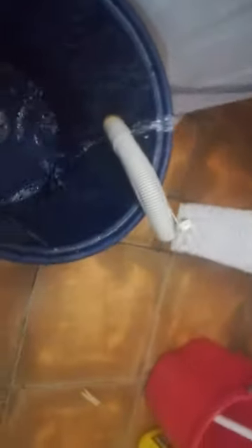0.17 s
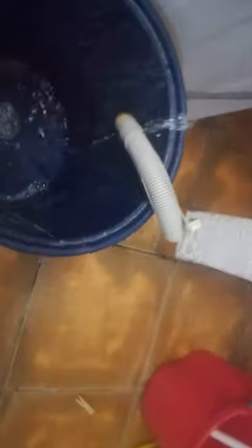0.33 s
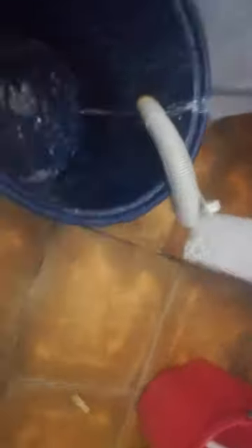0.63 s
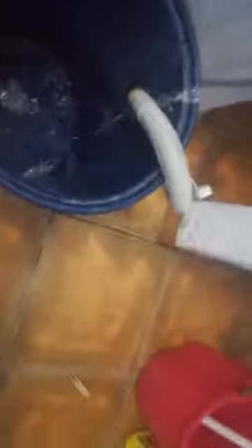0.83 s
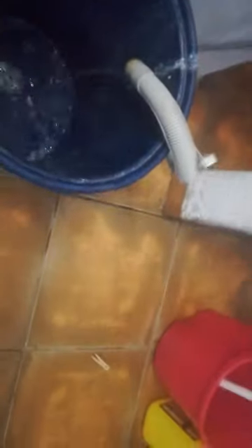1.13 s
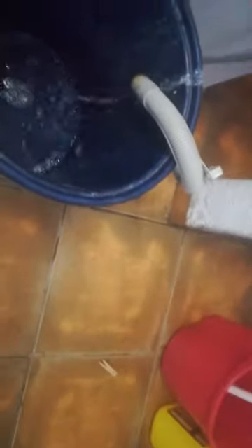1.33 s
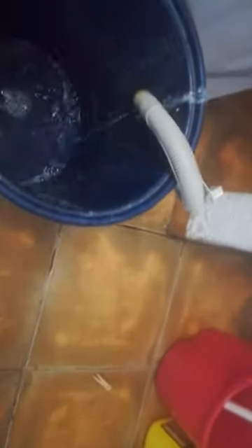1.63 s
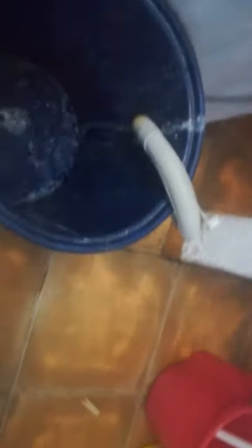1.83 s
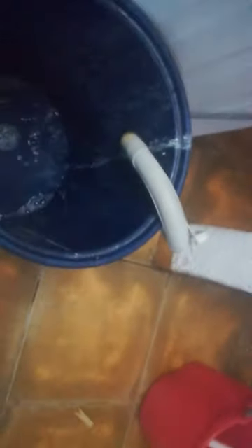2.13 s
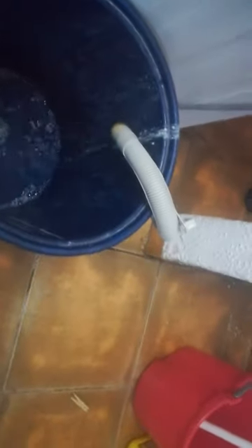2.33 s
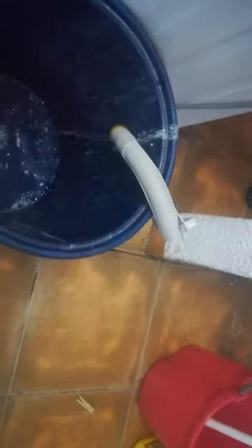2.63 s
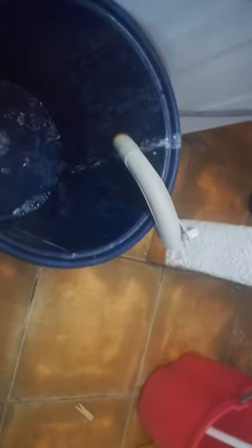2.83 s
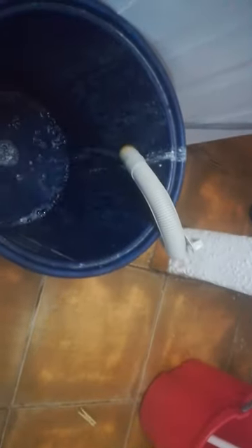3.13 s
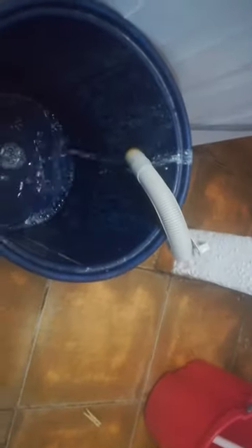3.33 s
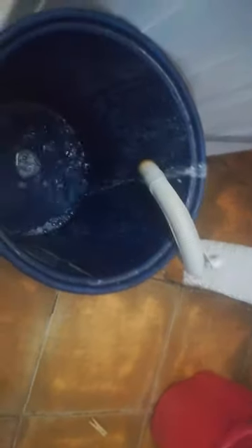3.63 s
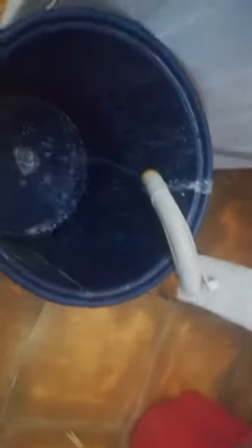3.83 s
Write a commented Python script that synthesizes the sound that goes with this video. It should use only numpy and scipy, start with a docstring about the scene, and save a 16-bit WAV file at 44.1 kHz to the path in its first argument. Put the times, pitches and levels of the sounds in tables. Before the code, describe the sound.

Water spurts from a drain hose into a plastic barrel, already splashing at 0 s, with new surges beginning near 0.2, 0.9, 1.6, 2.2, 2.9 and 3.6 s. Each builds from a brief lull into gurgling rush, bubbly plops and crisp spray ticks. A low mains-like pump hum near 150 Hz swells along, over rumble and throbbing. A dull knock falls near 1 s. Faint hiss, short room echo, left side brighter.

```python
"""In a tiled room, a washing machine's drain pump pushes water in surges up a ribbed hose into a plastic barrel.
The pump is a sum of sines on the mains multiples, swelling with each surge, over noise rumble and a low throb.
The water is flickering coloured noise, gurgling hose resonances, ringing bubbles, noise splats and bright spits.
The left microphone is nearer; the right hears the scene later and duller."""
import sys
import numpy as np
from scipy import signal
from scipy.fft import rfft, irfft, next_fast_len
from scipy.io import wavfile

SR = 44100
rng = np.random.default_rng(int(sys.argv[2]) if len(sys.argv) > 2 else 0)


def natural_amplitude(level_db):
    """Convert a level in decibels to a linear amplitude factor, elementwise."""
    exponent = np.asarray(level_db, float) / 20
    return 10 ** exponent


def to_wav(sig):
    """Store sig (one row per channel, or 1-D mono) as 16-bit WAV at the path in sys.argv[1].

    Samples outside -1..1 are clipped; the rate is SR.
    """
    pcm = np.clip(np.atleast_2d(sig), -1, 1) * 32767
    pcm = np.round(pcm).astype(np.int16)
    wavfile.write(sys.argv[1], SR, pcm.T)  # frames by channels


N = 175959


def at_time(rows):
    """Linear interpolation: each column of a time curve read at every sample."""
    s, *columns = np.transpose(rows)
    return [np.interp(np.arange(N) / SR, s, column) for column in columns]


def at_hz(points, hz):
    """Interpolation on a logarithmic frequency axis, as hearing spaces pitch."""
    point_hz, value = np.array(points)[:, 0], np.array(points)[:, 1]
    return np.interp(np.log(hz + 1), np.log(point_hz), value)


def rms_one(x):
    """Power normalisation: scale to rms 1."""
    return x / np.sqrt(np.mean(x ** 2) + 1e-20)


def drift(rate):
    """Low-passed random process: white noise through a double pole, spread 1, made at 1/40 of the sample rate."""
    pole = np.exp(-80 * np.pi * rate / SR)
    white = rng.standard_normal(N // 40 + 2002)
    slow = signal.lfilter([1], [1, -2 * pole, pole * pole], white)[2000:]  # skip the filter's start
    return np.interp(np.arange(N) / 40, np.arange(len(slow)), rms_one(slow))


# Incoherence of the noise between the two sides: pitch_hz [Hz], unshared_part [0-1]
UNSHARED_NOISE = [(60, 0.4), (300, 0.17), (1000, 0.58), (3000, 0.87), (8000, 1), (15000, 1)]


def noise(spectrum, patchy_db, rate):
    """Partial coherence: two partly alike channels of coloured noise whose octave bands flicker; left rms 1."""
    hz = np.fft.rfftfreq(N, 1 / SR)
    shared, own = rfft(rng.standard_normal((2, N)))
    apart = np.clip(at_hz(UNSHARED_NOISE, hz), 0, 1)
    right = np.sqrt(1 - apart ** 2) * shared + apart * own
    pair = np.array([shared, right]) * natural_amplitude(at_hz(spectrum, hz))
    out, together = 0, drift(rate)
    for centre in 62.5 * 2 ** np.arange(9):
        octaves_away = np.log2(np.clip(hz, 62.5, 16000) / centre)
        band = np.cos(np.pi / 2 * np.clip(octaves_away, -1, 1)) ** 2
        if at_hz(spectrum, centre) > -60:
            flicker_db = patchy_db * (0.94 * together + drift(2 * rate))
            out = out + irfft(pair * band, N) * natural_amplitude(flicker_db)
    return out / np.sqrt(np.mean(out[0] ** 2))


def add(out, s, grain):
    """Superposition: lay a grain into one channel from time s."""
    i = int(max(s, 0) * SR)
    out[i:i + len(grain)] += grain[:len(out) - i]


PLACE_DB, PLACE_S = 2.5, .00006  # scatter of level and lag on the right side


def place(out, s, grain, where):
    """Interaural difference: each drop falls at its own spot, so the right side gets its own level and lag."""
    add(out[0], s, grain)
    add(out[1], s + PLACE_S * where[0], grain * natural_amplitude(PLACE_DB * where[1]))


# Spectral density of the room hiss, relative: pitch_hz [Hz], level_db [dB per Hz]
HISS_SPECTRUM = [(500, 1.5), (700, -11), (1400, -2.5), (2300, -15), (3300, -7), (4500, -11.5), (7000, -15),
                 (11000, -20), (14000, -19), (15700, -23), (15900, -60)]
HISS_DB = -65
HISS_RIGHT_DB = 8  # hiss comes from all round, so the right side loses less of it


def room_hiss():
    """Diffuse field: almost steady coloured noise arriving from all round."""
    hiss = natural_amplitude(HISS_DB) * noise([(300, -78)] + HISS_SPECTRUM, patchy_db=.2, rate=4.1)
    return hiss * natural_amplitude(np.array([[0], [HISS_RIGHT_DB]]))


ROOM_T60_S, ROOM_CUT_HZ = 0.33, 11000


def room(x):
    """Reverberation by recirculation: six feedback delays a side, duller on every round."""
    size = next_fast_len(N + SR)
    w = 2 * np.pi * np.fft.rfftfreq(size, 1 / SR)
    dull = 1 / (1 + 1j * w / (2 * np.pi * ROOM_CUT_HZ))
    delays_s = rng.uniform(.011, .037, 12)
    loops = [natural_amplitude(-60 * d / ROOM_T60_S) * dull * np.exp(-1j * w * d) for d in delays_s]
    sides = [sum((-1) ** k * g / (1 - g) for k, g in enumerate(loops[c::2])) for c in range(2)]
    return irfft(rfft(x, size) * np.array(sides), size)[:, :N]


# Pump load, as a tone level: start_s [s], level_db [dB]
LOAD = [(0.0, -34), (0.04, -35.5), (0.17, -32), (0.23, -56), (0.43, -38), (0.77, -30.5), (0.83, -36.5),
        (0.88, -48), (1.19, -35), (1.49, -35), (1.58, -54), (1.88, -31), (2.12, -33), (2.19, -38.5),
        (2.23, -59.5), (2.57, -35), (2.8, -32), (2.87, -39), (2.91, -57), (3.23, -30.5), (3.5, -33),
        (3.54, -39), (3.6, -60.5), (3.82, -33.5), (3.93, -31), (3.99, -34)]
FULL_LOAD_DB = -32.5


def load_swing():
    """Load modulation: the pump's load against full load, in dB."""
    return at_time(LOAD)[0] - FULL_LOAD_DB


# Spectral density of the rumble, relative: pitch_hz [Hz], level_db [dB per Hz]
RUMBLE_SPECTRUM = [(30, -17), (45, -7.5), (75, 2.5), (120, 1.5), (180, 0.5), (225, -1), (280, -5),
                   (400, -5.5), (600, -19.5), (900, -15.5), (1500, -50)]
RUMBLE_DB, RUMBLE_LOAD_SHARE = -44, 0.34  # level at full load; share of the load swing


def rumble(load_db):
    """Broadband low-frequency excitation: coloured noise that partly follows the load."""
    level = natural_amplitude(RUMBLE_DB + RUMBLE_LOAD_SHARE * load_db)
    return level * noise(RUMBLE_SPECTRUM, patchy_db=2.5, rate=3.3)


# Thin steady-level tone: pitch_hz [Hz], level_db [dB]
WHINE = [(14410, -83.5)]


def whine():
    """Phase modulation: a thin high sine whose phase wanders."""
    t, out = np.arange(N) / SR, np.zeros(N)
    for hz, db in WHINE:
        wander_rad = 2.5 * drift(8.0)
        out += np.sqrt(2) * natural_amplitude(db) * np.sin(2 * np.pi * hz * t + wander_rad)
    return out


# A dull knock: start_s [s], level_db [dB], pitch_hz [Hz], t60_s [s]
KNOCKS = [(0.988, -30.5, 82.5, 0.21)]
KNOCK_RISE_S = 0.011


def knock():
    """Damped resonance: a sine under a linear rise and an exponential decay."""
    t, out = np.arange(N) / SR, np.zeros(N)
    for s, db, hz, t60 in KNOCKS:
        envelope = natural_amplitude(db - 60 * t / t60) * (t / KNOCK_RISE_S)
        add(out, s, envelope * np.sin(2 * np.pi * hz * t))
    return out


# Low throb: start_s [s], level_db [dB]
THROB = [(0.0, -50), (0.15, -39.5), (0.23, -57), (0.82, -45), (0.97, -59), (1.04, -42), (1.13, -66),
         (1.38, -44.5), (1.79, -52.5), (1.84, -76), (2.08, -45), (2.43, -51), (2.58, -76), (2.64, -53),
         (2.81, -45), (3.19, -68), (3.41, -44.5), (3.88, -60), (3.93, -57), (3.99, -50)]
THROB_HZ, THROB_WANDER_RAD = 52.7, 1.83


def throb():
    """Amplitude and phase modulation: a low sine that pulses and wanders in phase."""
    t = np.arange(N) / SR
    phase = 2 * np.pi * THROB_HZ * t + THROB_WANDER_RAD * drift(2.46)
    return np.sqrt(2) * natural_amplitude(at_time(THROB)[0]) * np.sin(phase)


MAINS_HZ = 50.11
FLUTTER_DB = 2.5  # quick unsteadiness, largest in tones that follow the load least

# Level of the sixth mains multiple before flutter: start_s [s], level_db [dB]
SIXTH = [(0.0, -50), (1.2, -52), (1.28, -64.5), (2.19, -53.5), (2.37, -64), (2.48, -65), (3.96, -51),
         (3.99, -51)]


def sixth_multiple():
    """Harmonic of the supply: the sixth multiple, which follows a level curve of its own."""
    t = np.arange(N) / SR
    level = natural_amplitude(at_time(SIXTH)[0] + FLUTTER_DB * drift(16.0))
    return np.sqrt(2) * level * np.sin(2 * np.pi * 6 * MAINS_HZ * t + 0.34 * drift(4.0))


# Where each surge begins: start_s [s]
SURGES_S = [-0.44, 0.23, 0.88, 1.58, 2.23, 2.91, 3.6]
SAG_TOP_HZ, SAG_AFTER_S, SAG_HZ_PER_S = 2.5, .27, 13  # offset at surge start, wait, then fall


def surge_sag():
    """Frequency modulation: phase, in rad, of a tone that starts each surge high and then sags."""
    t = np.arange(N) / SR
    since = t - np.array(SURGES_S)[np.searchsorted(SURGES_S, t) - 1]
    offset_hz = SAG_TOP_HZ - SAG_HZ_PER_S * np.maximum(since - SAG_AFTER_S, 0)
    return 2 * np.pi * np.cumsum(offset_hz) / SR


# Pump tones: mains_multiple, level_db at full load [dB], load_share of the swing [0-1],
# waver_db [dB], phase_waver [rad]
PUMP_TONES = [(2, -45.5, 0.06, 1, 0.7), (3, -32, 0.88, 0.68, 0.14), (4, -55.5, 0.13, 2, 0.79),
              (5, -52.5, 0.15, 1.5, 0.3), (7, -59.5, 0.07, 2.5, 1), (8, -67.5, 0.22, 1, 0.5),
              (9, -57, 0.36, 8, 0.82), (11, -58, 0.6, 0, 0.84)]


def pump_hum(load_db):
    """Harmonic series of the supply: mains multiples that swell with the load and waver in phase."""
    t, out = np.arange(N) / SR, np.zeros(N)
    sag = surge_sag()
    for multiple, db, share, waver_db, waver_rad in PUMP_TONES:
        phase = 2 * np.pi * (multiple * MAINS_HZ * t + rng.random()) + waver_rad * drift(3.55)
        if multiple == 3:  # the strongest tone
            phase = phase + sag
        level_db = db + share * load_db + waver_db * drift(3.2)
        level_db = level_db + (1 - share) * FLUTTER_DB * drift(9.8)
        out += np.sqrt(2) * natural_amplitude(level_db) * np.sin(phase)
    return out


# Air in the hose, before GURGLE_DB: start_s [s], low_level_db [dB], upper_level_db [dB]
GURGLE = [(0.0, -37, -77), (0.131, -54, -51), (0.28, -57, -60), (0.47, -53, -75), (0.84, -87, -73),
          (0.98, -71, -66), (1.1, -48.5, -54), (1.37, -62, -68), (1.38, -52, -42), (1.64, -68, -83),
          (1.84, -41, -47), (2.08, -56, -59), (2.11, -54, -45), (2.23, -60, -71), (2.47, -49, -59),
          (2.56, -69, -59), (2.64, -43.5, -63), (2.69, -59, -39), (2.91, -57.5, -74), (3.1, -60.5, -53),
          (3.16, -44, -51.5), (3.48, -59, -49), (3.53, -49, -75), (3.76, -66.5, -66), (3.8, -41.5, -48.5),
          (3.99, -49, -48.5)]
# The two hose resonances: low_edge_hz [Hz], high_edge_hz [Hz]
GURGLE_BANDS = [(205, 237.5), (380, 557)]
GURGLE_DB = 1.5


def gurgle():
    """Resonance: noise filtered by two low resonances of the hose."""
    out = 0
    for db, band, white in zip(at_time(GURGLE), GURGLE_BANDS, rng.standard_normal((2, N))):
        resonance = signal.butter(2, band, "band", fs=SR, output="sos")
        out = out + natural_amplitude(db + GURGLE_DB) * rms_one(signal.sosfilt(resonance, white))
    return out


# Water flow, before each layer's own gain: start_s [s], rush_level_db [dB], splash_level_db [dB]
FLOW = [(0.0, -58, -56.5), (0.05, -59, -57), (0.15, -64, -60.5), (0.23, -73, -64.5), (0.47, -58.5, -78),
        (0.7, -53, -58.5), (0.85, -63, -70), (0.97, -72, -65.5), (1.12, -63, -71), (1.22, -59.5, -57.5),
        (1.33, -53.5, -60.5), (1.38, -53, -54.5), (1.51, -99, -63), (1.76, -58.5, -80.5),
        (1.88, -58.5, -79), (1.99, -54, -52), (2.07, -55.5, -57), (2.19, -79, -62.5), (2.32, -74.5, -71),
        (2.48, -60, -71.5), (2.63, -54, -71.5), (2.74, -56.5, -56), (2.89, -73, -64), (3.14, -57.5, -76.5),
        (3.3, -56, -56.5), (3.4, -53, -56.5), (3.51, -76.5, -59), (3.73, -59.5, -78.5), (3.87, -56, -66),
        (3.99, -63, -48.5)]


def flow_levels():
    """Envelope control: levels of the rush in the hose and the splash in the barrel."""
    return at_time(FLOW)


# Spectral density of the rush, relative: pitch_hz [Hz], level_db [dB per Hz]
RUSH_SPECTRUM = [(400, -6), (470, -1), (560, -1), (850, -4), (1050, -5.5), (1500, -7), (2100, -12.5),
                 (2800, -18.5), (4000, -25)]
RUSH_DB = 8.5  # gain over the flow level


def rush(rush_db):
    """Flow noise: quickly flickering coloured noise of water in the hose."""
    spectrum = [(250, -79.0)] + RUSH_SPECTRUM + [(8000, -69)]
    return natural_amplitude(rush_db + RUSH_DB) * noise(spectrum, patchy_db=1.5, rate=14.0)


# Spectral density of the splash, relative: pitch_hz [Hz], level_db [dB per Hz]
SPLASH_SPECTRUM = [(1500, -3.5), (1800, -8), (2500, -9.5), (3200, -5.5), (4200, -10.5), (5200, -32.5),
                   (7000, -27.5), (9000, -26)]
SPLASH_DB = 2  # gain over the flow level


def splash(splash_db):
    """Impact noise in the mass: patchy coloured noise of water landing in the barrel."""
    spectrum = [(900, -80)] + SPLASH_SPECTRUM + [(14000, -64)]
    return natural_amplitude(splash_db + SPLASH_DB) * noise(spectrum, patchy_db=4.0, rate=10.0)


SIZE_TOP = 2.2  # largest random size of an impact or bubble, in spreads
CRACKLE_PER_S, CRACKLE_T60_S = 320, 0.0046  # rate at the fullest splash, before clumping
CRACKLE_DB, CRACKLE_SPREAD_DB = 2.5, 4.5
# Colour of small impacts, relative: pitch_hz [Hz], level_db [dB per Hz]
CRACKLE_SPECTRUM = [(300, -38), (600, 8.5), (1200, -3), (2600, -3.5), (4000, -7), (6000, -12),
                    (10000, -24.5), (15000, -38)]


def crackle(splash_db):
    """Clumped Poisson process: small random noise impacts in four groups, three tilted bright, one dull."""
    rate = CRACKLE_PER_S * natural_amplitude((splash_db - splash_db.max()) / 2 + 5.3 * drift(7.4))
    struck = rng.random(N) < rate / SR
    size = np.minimum(rng.exponential(1, N), SIZE_TOP)
    hits = struck * natural_amplitude(splash_db + CRACKLE_DB + CRACKLE_SPREAD_DB * size)
    group = rng.integers(0, 4, N)
    decay = natural_amplitude(-60 / (CRACKLE_T60_S * SR))
    hz = np.fft.rfftfreq(N, 1 / SR)
    out = 0
    for k, tilt_db in enumerate([3.5, 2.5, -3.5, 3.5]):  # dB per octave about 2500 Hz
        envelope = signal.lfilter([1], [1, -decay], hits * (group == k))
        bursts = envelope * rng.standard_normal(N)
        colour = natural_amplitude(at_hz(CRACKLE_SPECTRUM, hz) + tilt_db * np.log2((hz + 1) / 2500))
        colour = colour / np.sqrt(np.mean(colour ** 2))
        right = natural_amplitude(PLACE_DB * rng.normal()) * np.exp(-2j * np.pi * hz * PLACE_S * rng.normal())
        out = out + irfft(rfft(bursts) * colour * [np.ones_like(right), right], N)
    return out


BUBBLE_RISE, BUBBLE_CLICK = 0.1, 0.1  # phase stretch by t60; click against a ring of peak 1
BUBBLE_SWELL_CYCLES = 1  # soft start


def bubble(db, hz, t60, rise):
    """Bubble resonance: an impact click and a sine that swells, climbs in pitch and dies."""
    t = np.arange(int(abs(t60) * SR) + 8) / SR
    swell = 1 - np.exp(-(t * hz / BUBBLE_SWELL_CYCLES) ** 2)
    ringing = np.sin(2 * np.pi * hz * t * (1 + rise * t / t60)) * natural_amplitude(-60 * t / t60) * swell
    click = BUBBLE_CLICK * np.exp(-t * hz * 3) * np.sin(2 * np.pi * hz * t)
    return natural_amplitude(db) * (ringing / np.abs(ringing).max() + click)


def splat(white, low_hz, high_hz, t60):
    """Impulsive excitation: a short decaying burst of band-passed noise, peak 1."""
    edges = np.clip([low_hz, high_hz], 200, 20000)
    band = signal.butter(2, edges, "band", fs=SR, output="sos")
    fading = white * natural_amplitude(-60 * np.arange(len(white)) / SR / t60)
    burst = signal.sosfilt(band, fading)
    return burst / np.abs(burst).max()


SWARM_PER_S, SWARM_CYCLES, SWARM_HZ = 600, 14.8, (588, 5500)  # rate at the fullest splash
SWARM_DB, SWARM_SPREAD_DB, SWARM_TILT_DB_PER_OCT = 13.5, 3.5, -6.5


def swarm(out, splash_db):
    """Random superposition: many small bubbles, denser as the splash grows, weaker away from 2200 Hz."""
    draws, spots = rng.random((6000, 5)), rng.standard_normal((6000, 2))
    vigour = natural_amplitude(splash_db - splash_db.max())
    for (s, keep, pitch, size, rise), where in zip(draws, spots):
        i = int(s * N)
        if keep < SWARM_PER_S * vigour[i] ** .5 * N / SR / len(draws):
            hz = SWARM_HZ[0] * (SWARM_HZ[1] / SWARM_HZ[0]) ** pitch
            db = splash_db[i] + SWARM_DB + SWARM_SPREAD_DB * min(-np.log(size), SIZE_TOP)
            db = db + SWARM_TILT_DB_PER_OCT * abs(np.log2(hz / 2200))
            t60 = SWARM_CYCLES * (.5 + rise) / hz
            place(out, i / SR, bubble(db, hz, t60, 2 * BUBBLE_RISE * rise), where)


# Bright ticks of spray, peak before SPIT_DB: start_s [s], level_db [dB], pitch_hz [Hz]
SPITS = [(0.032, -41.5, 7740), (0.0638, -62, 8300), (0.0988, -46.5, 6540), (0.1885, -52, 8010),
         (0.3167, -56, 6150), (0.647, -52, 8100), (0.66, -48, 5740), (0.6783, -40, 5600),
         (0.735, -47, 6270), (0.7538, -41.5, 5660), (0.773, -40, 5300), (1.003, -63, 6530),
         (1.174, -49.5, 5750), (1.2462, -43, 7000), (1.265, -40, 13300), (1.3145, -44, 7760),
         (1.388, -47, 5790), (1.487, -42.5, 5740), (1.508, -52, 5500), (1.547, -55, 6270),
         (1.7863, -53.5, 5560), (1.9073, -53, 6900), (1.9415, -57, 5590), (1.9606, -50, 6860),
         (1.9844, -36, 5960), (2.0592, -53, 5900), (2.1115, -54, 7200), (2.535, -37, 13100),
         (2.7693, -50, 5670), (3.053, -49, 5600), (3.3059, -59, 5500), (3.307, -47.5, 8000),
         (3.3483, -53.5, 8140), (3.434, -51, 6100), (3.463, -46, 6170), (3.8644, -48.5, 6240),
         (3.9556, -48, 6850), (3.9687, -47, 7700), (0.3167, -56, 13600), (0.5995, -56, 8500),
         (0.562, -55, 7450), (0.6255, -58, 11800), (0.7342, -55, 14300), (1.2194, -65, 14400),
         (1.3663, -62, 10500), (1.4142, -59, 13300), (1.5473, -57.5, 11600), (1.9839, -54, 12900),
         (2.1106, -59, 11100), (2.6297, -55, 7500), (2.7465, -67, 9350), (3.3059, -51, 10800),
         (3.3483, -64, 14400), (3.4346, -61, 10600), (3.97, -45, 14800)]
SPIT_DB, SPIT_T60_S, SPIT_HALF_WIDTH_HZ = 3.5, 0.018, 1160
CRACK_DB, CRACK_T60_S, CRACK_HZ = -7.5, .005, (3500, 13500)  # broad snap that opens each tick


def spits(out):
    """Transient radiation: each tick of spray is a narrow noise burst opened by a shorter broad snap."""
    for (s, db, hz), white in zip(SPITS, rng.standard_normal((len(SPITS), 1300))):
        where = white[-2:]
        tick = splat(white, hz - SPIT_HALF_WIDTH_HZ, hz + SPIT_HALF_WIDTH_HZ, SPIT_T60_S)
        snap = splat(white[::-1], *CRACK_HZ, CRACK_T60_S)
        place(out, s, natural_amplitude(db + SPIT_DB) * tick, where)
        place(out, s, natural_amplitude(db + SPIT_DB + CRACK_DB) * snap, where)


# The clearest drops, peak before DROP_DB: start_s [s], level_db [dB], pitch_hz [Hz], t60_s [s],
# ring_share that rings as a bubble rather than splats [0-1]
DROPS = [(0.096, -22, 1260, 0.016, 0.34), (0.13, -31.5, 1050, 0.063, 0.74), (0.187, -35, 1605, 0.065, 0.22),
         (0.257, -35.5, 710, 0.04, 0.55), (0.643, -36, 1465, 0.035, 0.8), (0.677, -32.5, 1070, 0.02, 0.6),
         (0.753, -33, 820, 0.047, 0.35), (0.808, -32.5, 830, 0.048, 0.7), (1.217, -44, 1500, 0.02, 0.4),
         (1.313, -37.5, 1140, 0.038, 0.56), (1.3885, -32.5, 620, 0.041, 0.4),
         (1.485, -42.5, 1190, 0.045, 0.2), (1.704, -37.5, 740, 0.046, 0.24), (1.947, -41, 1610, 0.049, 1),
         (1.967, -37, 1410, 0.025, 0.4), (2.111, -30, 964, 0.029, 0.42), (2.147, -31.5, 780, 0.03, 0.58),
         (2.159, -32.5, 810, 0.018, 0.3), (2.632, -31.5, 1120, 0.023, 0.43), (2.699, -34, 910, 0.014, 0.3),
         (2.745, -31.5, 734, 0.063, 0.41), (2.91, -33.5, 1334, 0.028, 0.54), (3.254, -36, 1410, 0.09, 0.24),
         (3.518, -44, 1330, 0.027, 0.96), (3.692, -26.5, 940, 0.016, 0.44), (3.867, -39, 1360, 0.028, 0.5),
         (3.973, -34, 1070, 0.019, 0.1), (0.6005, -43, 1650, 0.015, 0.7), (2.372, -47.5, 2800, 0.023, 0.64),
         (1.206, -38.5, 3500, 0.053, 0.2), (1.232, -40.5, 3270, 0.025, 0.2),
         (2.7135, -40, 3500, 0.02, 0.66), (2.632, -40.5, 2600, 0.019, 0.43),
         (0.0638, -34, 2140, 0.033, 0.5), (0.0957, -26, 2600, 0.021, 0.6),
         (0.129, -35.5, 3000, 0.0074, 0.36), (0.317, -47.5, 4600, 0.012, 0.9),
         (0.389, -43.5, 2610, 0.041, 0.5), (0.6005, -39, 2400, 0.015, 1), (0.6426, -34.5, 2300, 0.018, 1),
         (0.6731, -34, 2330, 0.04, 0.3), (0.751, -34.5, 2350, 0.03, 0.28), (0.8058, -42, 2300, 0.041, 0.1),
         (1.0058, -36, 3700, 0.023, 0.44), (1.1419, -40.5, 4450, 0.012, 0.7),
         (1.2152, -34.5, 2380, 0.017, 0.67), (1.2149, -40.5, 2940, 0.037, 0),
         (1.2595, -33, 3550, 0.025, 0.34), (1.2986, -34.5, 2300, 0.016, 0.5),
         (1.3487, -37.5, 2400, 0.025, 0.2), (1.3813, -28, 2430, 0.023, 0.85),
         (1.485, -38, 3070, 0.026, 0.13), (1.945, -24, 2220, 0.015, 0.52), (1.9844, -36, 2270, 0.016, 0.2),
         (2.075, -35, 2570, 0.022, 0.67), (2.0877, -26.5, 2670, 0.016, 0.63),
         (2.1558, -43, 2420, 0.017, 0.6), (2.1695, -38, 2700, 0.022, 1), (2.374, -35, 4500, 0.018, 0.75),
         (2.6413, -37, 2830, 0.021, 0.47), (2.6808, -45, 3460, 0.033, 0.83),
         (2.6995, -42, 2380, 0.012, 0.4), (2.743, -38, 2510, 0.019, 0.7),
         (2.7598, -24.5, 2070, 0.037, 0.29), (2.9098, -44, 2400, 0.009, 0.95),
         (3.2537, -34, 2610, 0.0061, 0.86), (3.3127, -33, 2730, 0.034, 0.4),
         (3.376, -35.5, 2670, 0.034, 0.57), (3.46, -25, 2630, 0.013, 0.7),
         (3.5108, -38.5, 2670, 0.035, 0.56), (3.6908, -34.5, 1600, 0.016, 0.26),
         (0.0703, -38, 2160, 0.017, 0.7), (0.0805, -30.5, 2870, 0.028, 0.36),
         (1.2299, -39.5, 1180, 0.041, 0), (1.3558, -32, 1790, 0.019, 0.5), (1.3664, -41, 2560, 0.011, 0.6),
         (1.9597, -28.5, 2980, 0.018, 0.25), (2.713, -38, 1100, 0.03, 0), (2.804, -34.5, 2900, 0.02, 0.54),
         (2.8654, -40, 2440, 0.017, 0.55), (2.933, -46, 1360, 0.041, 0.94),
         (3.2639, -35, 2670, 0.0099, 0.8), (3.3504, -40, 1470, 0.022, 0.6), (3.72, -47, 1170, 0.012, 0.5)]
DROP_DB, SPLAT_HALF_WIDTH_OCT = 4.5, 0.39


def clear_drops(out):
    """Resonance against impact: each drop divides between a ringing bubble and a noise splat."""
    width = 2 ** SPLAT_HALF_WIDTH_OCT
    for (s, db, hz, t60, rings), white in zip(DROPS, rng.standard_normal((len(DROPS), 2000))):
        rings, where = np.clip(rings, 0, 1), white[-2:]
        ring = bubble(db + DROP_DB, hz, t60, BUBBLE_RISE)
        burst = natural_amplitude(db + DROP_DB) * splat(white, hz / width, hz * width, t60)
        place(out, s, rings * ring, where)
        place(out, s, (1 - rings) * burst, where)


def scene():
    """Superposition of sources: room hiss, pump, water and the reverberation of the drops."""
    load_db = load_swing()
    rush_db, splash_db = flow_levels()
    hum = whine() + knock() + throb() + sixth_multiple() + pump_hum(load_db)
    drops = crackle(splash_db)
    swarm(drops, splash_db)
    spits(drops)
    clear_drops(drops)
    echoes = natural_amplitude(-15.5) * room(drops[0])
    water = gurgle() + rush(rush_db) + splash(splash_db) + drops
    return room_hiss() + echoes + rumble(load_db) + hum + water


def band_limit(x):
    """A steep low-pass at the top of the band."""
    return signal.sosfilt(signal.butter(12, 16650, fs=SR, output="sos"), x)


# Level of the left side over the right: pitch_hz [Hz], level_db [dB]
SHADOW = [(30, 1), (60, 0.5), (110, -2.45), (200, 0), (380, 1), (700, 9), (1290, 14.5), (2380, 10.5),
          (4400, 12), (8120, 11), (15000, 8.5)]
# Lead of the left side over the right: pitch_hz [Hz], lead_s [s]
LEFT_LEAD = [(50, .0003), (100, 0.00047), (150, 0.00064), (250, 0.00091), (500, 0.00074), (1200, 0.00074),
             (3000, 0.000689), (15000, 0.000562)]


def record(dry):
    """Acoustic shadow and path difference: the right microphone hears later and duller; a low-pass ends the band."""
    size = next_fast_len(N + 256)
    hz = np.fft.rfftfreq(size, 1 / SR)
    far = natural_amplitude(-at_hz(SHADOW, hz)) * np.exp(-2j * np.pi * hz * at_hz(LEFT_LEAD, hz))
    both = irfft(rfft(dry, size) * np.array([np.ones_like(far), far]), size)[:, :N]
    low_pass = signal.cheby2(14, 60, 16150, fs=SR, output="sos")  # 60 dB down from 16150 Hz
    mix = signal.sosfilt(low_pass, both)
    return band_limit(mix)


dry = scene()
out = record(dry)
to_wav(out)
```